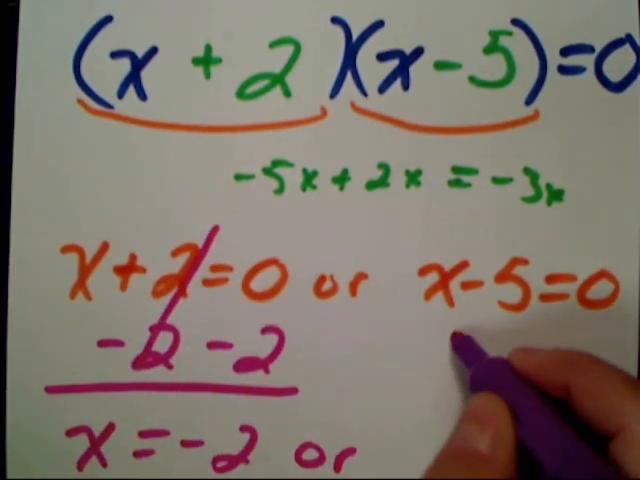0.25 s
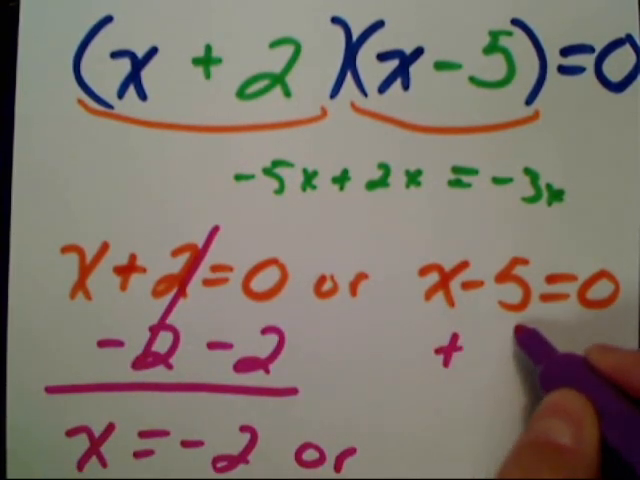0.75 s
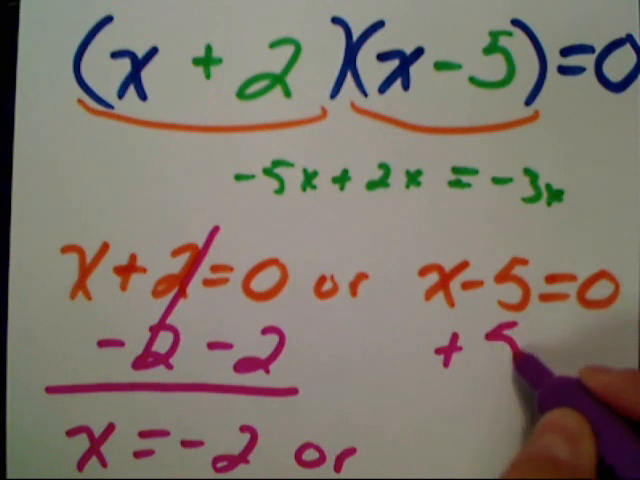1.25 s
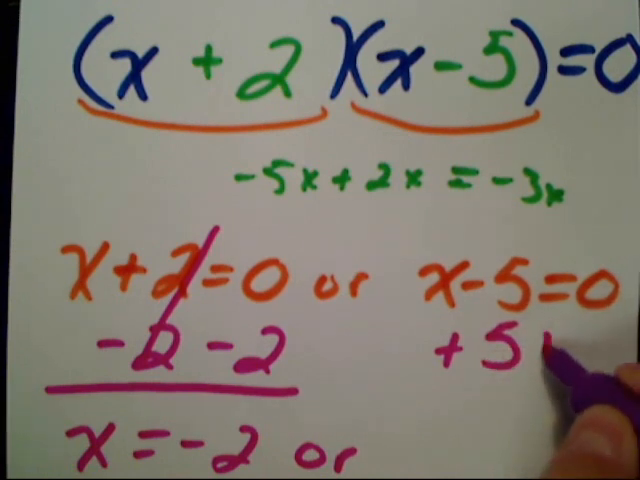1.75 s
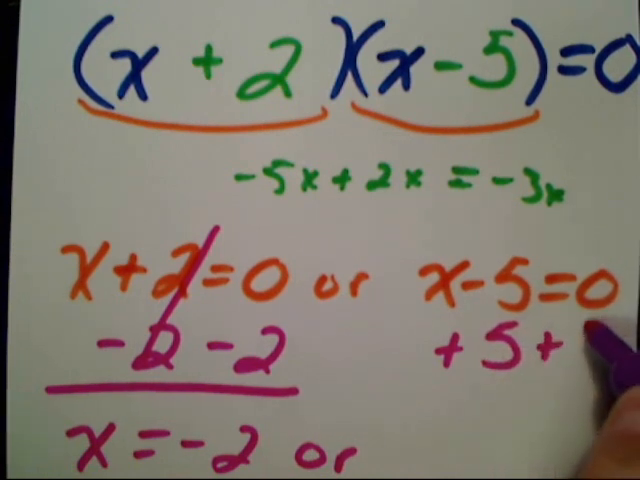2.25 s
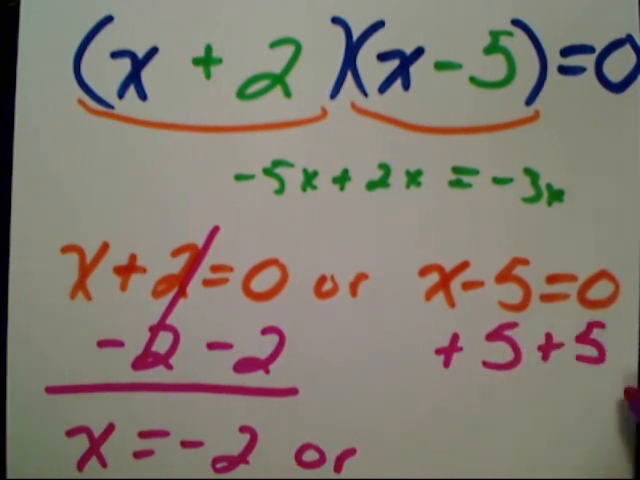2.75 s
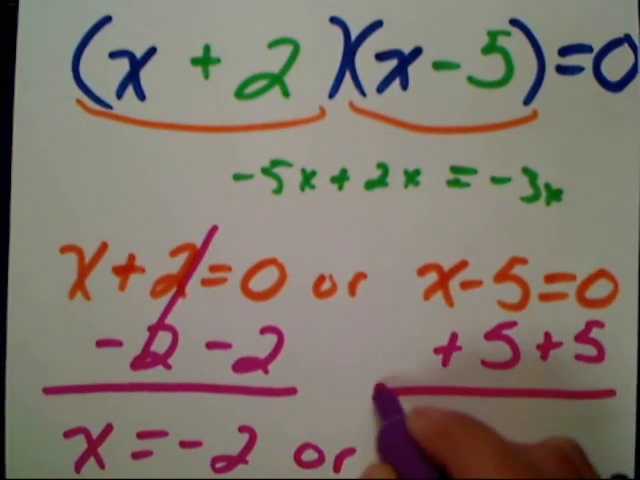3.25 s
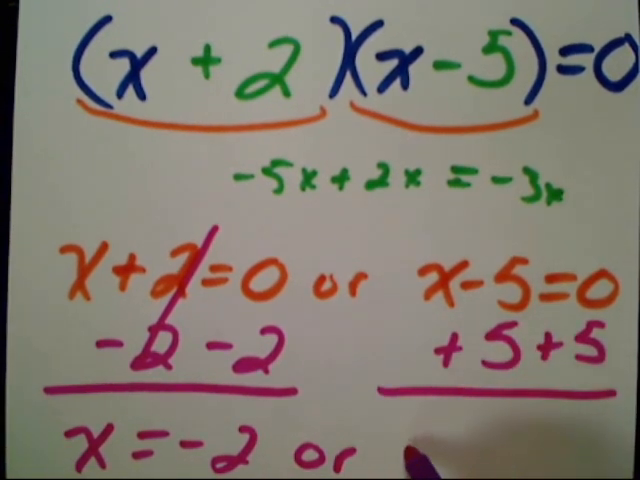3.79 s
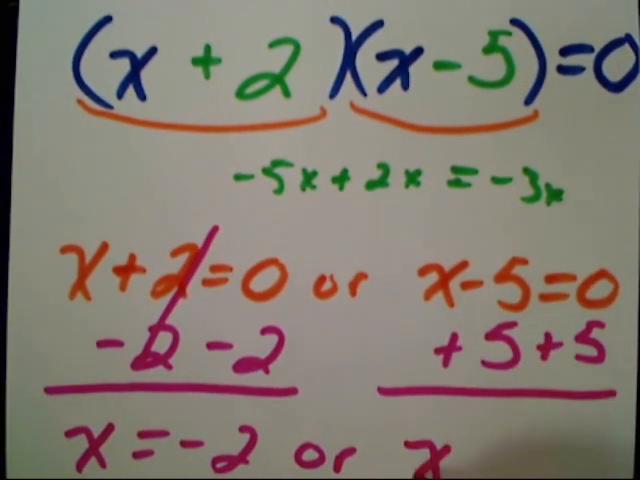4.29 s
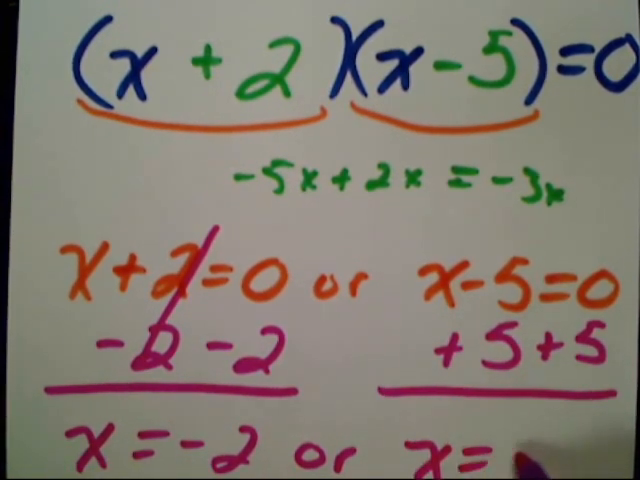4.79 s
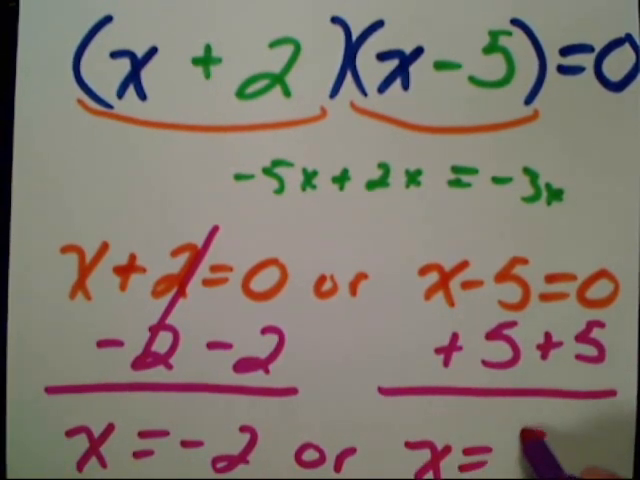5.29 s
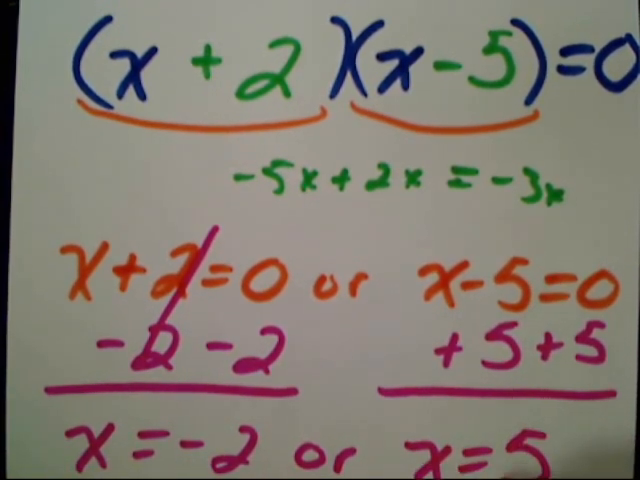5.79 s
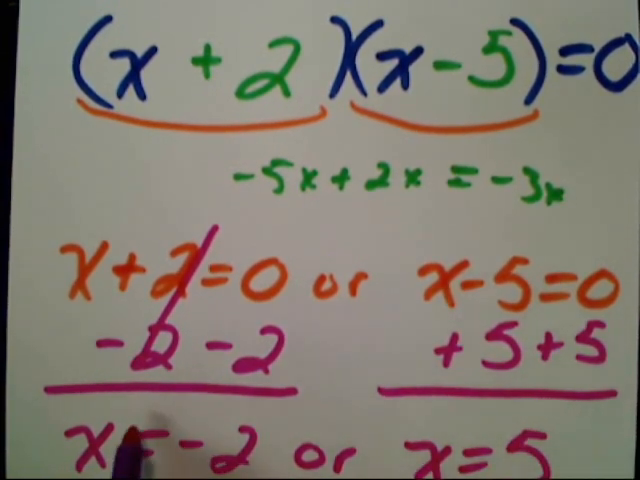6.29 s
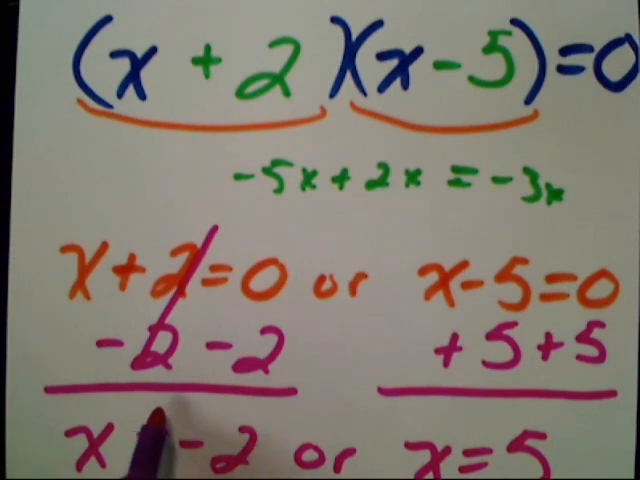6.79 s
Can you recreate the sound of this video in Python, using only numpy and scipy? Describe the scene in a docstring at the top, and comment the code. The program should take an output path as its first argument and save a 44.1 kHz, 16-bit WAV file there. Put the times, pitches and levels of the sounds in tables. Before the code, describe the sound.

A felt-tip marker taps and scratches short dry strokes on paper, a fast underline and a longer loop, over a low steady room hum.

```python
"""A felt-tip marker writes short strokes, a fast underline and a long loop on a sheet of paper.
Its sounds are tiny random impulses (snagging fibres), filtered into scrape, rasp and top fizz.
Each tap is a few ringing desk tones plus a noise click; a brief squeak, then faint wavering tones, are sines.
The hand brushes the sheet in smooth swells of filtered impulses; a short room tail follows it all.
Mains hum and a thin electronic whine are sine tones; low rumble and air are filtered noise."""
import sys
import numpy as np
from scipy import signal
from scipy.fft import rfft, irfft, next_fast_len
from scipy.io import wavfile
from scipy.ndimage import uniform_filter1d, map_coordinates

SR = 44100
rng = np.random.default_rng(int(sys.argv[2]) if len(sys.argv) > 2 else 0)


def master(y):
    """Save y as 16-bit WAV."""
    cut = np.clip(np.atleast_2d(y).T, -1, 1)
    pcm = np.round(cut * 32767)  # scale
    wavfile.write(sys.argv[1], SR, pcm.astype(np.int16))


N = 310464  # length in samples

# Hum and electronic whine: pitch_hz, level_db (rms)
HUM_TONES = [(29.6,-50.5),(58.2,-48),(77,-54.5),(97,-56),(119.8,-44.5),(237,-66),(281,-66),(353,-68),(709,-69.5),(1863,-71),(2762,-78.5),(3725,-74),(5588,-75),(7450,-83),(7989.5,-67.5),(12495,-73)]
# Tone colour of the low room rumble: pitch_hz, relative_level_db
RUMBLE_COLOUR = [(18,2.5),(30,6.5),(40,-9),(52,7),(60,-2.5),(70,-10),(87,-5.5),(102,-3.5),(124,-10.5),(146,-13),(220,-23.5),(300,-44)]
# Tone colour of the room's air: pitch_hz, relative_level_db
AIR_COLOUR = [(120,-12),(190,-7.5),(250,2),(320,-7.5),(480,-8),(680,-14),(820,-17),(1500,-20.5),(2400,-22),(3200,-27.5),(6000,-32),(10000,-34),(12500,-37),(15800,-36)]
# The hand shifting on the sheet: start_s, length_s, level_db
HAND_SHIFTS = [(-.08, 0.18, -53.5), (0.816, 0.15, -51), (1.368, 0.11, -57), (2.0, .14, -59),
               (2.11, 0.15, -55.5), (2.62, 0.11, -63), (2.718, 0.23, -59.5), (2.871, 0.14, -52),
               (3.686, 0.17, -57.5), (4.115, 0.18, -50), (5.16, .09, -53.5), (5.232, 0.085, -52.5),
               (5.63, 0.042, -54.5)]
# Tone colour of skin on paper: pitch_hz, relative_level_db
BRUSH_COLOUR = [(500,-1),(2000,-10),(5000,-2),(8000,-4),(11000,1.5),(13000,-2),(15800,-9.5)]
# One row per short nib movement; the levels are settings that the friction and mix then adjust:
# start_s, attack_s, hold_s, scrape_db, rasp_db, fizz_db, favoured_hz, damped_hz
PEN_STROKES = [ (0.231, 0.03, .006, -39, -4, -0.5, 5630, 2500),
               (0.331, 0.011, 0.038, -47, 1, -1, 6300, 5230),
               (0.504, 0.026, 0.015, -40, -1.5, -5.5, 5230, 6450),
               (.535, .02, 0.13, -46.5, 3, -3.5, 3230, 6500),
               (0.649, 0.081, 0.023, -34.5, 1, -0.5, 4640, 2660),
               (1.1, 0.029, 0.027, -43, 2, 1, 3250, 10100), (1.309, .011, 0.02, -43, -4, -1.5, 3320, 6300),
               (1.555, 0.027, .009, -36, -6, -3, 3660, 10000),
               (1.654, 0.063, 0.0072, -43, -1.5, -5.5, 6000, 4450),
               (1.787, 0.041, .018, -41.5, 0.5, 0, 3600, 9800),
               (1.84, 0.022, 0.049, -47.5, 0.5, 0.5, 3560, 9800),
               (1.923, 0.035, 0.021, -36, -11, -4.5, 7760, 2520),
               (3.261, .027, 0.026, -40.5, 2.5, -2.5, 4430, 3280),
               (3.314, 0.045, 0.055, -41.5, 1.5, -7.5, 4500, 3240),
               (3.598, 0.013, 0.018, -38.5, 1.5, 5.5, 4620, 3540),
               (3.622, 0.017, 0.017, -34, 0.5, -3, 6100, 3570),
               (3.903, 0.0097, 0.019, -39, -3, -2.5, 5230, 3530),
               (4.09, 0.018, .01, -39, -8, -2, 9000, 8100), (4.599, .022, 0.02, -35, 4, -6.5, 6300, 8600),
               (4.726, 0.015, 0.067, -48, 3, 2.5, 6200, 8600),
               (4.891, .013, 0.055, -42.5, 0, -5, 3200, 7000),
               (4.943, .02, 0.099, -46, 2.5, -10, 3240, 7150),
               (5.045, 0.065, 0.033, -35.5, 2, 1, 5100, 2580), ]
# The fast underline, before the mix trims: time_s, scrape_db, fizz_db (an offset)
UNDERLINE_LEVELS = [(2.35, -70, 10), (2.366, -44, -6), (2.376, -37.5, 0), (2.426, -33.5, 6),
                    (2.472, -34.5, 9.5), (2.552, -31, 9.5), (2.614, -35.5, 3.5), (2.66, -62, -9)]
# Bands the sheet lifts and weakens along the underline: time_s, favoured_hz, damped_hz
UNDERLINE_PLACES = [(2.39, 5960, 3250), (2.44, 7170, 3200), (2.6, 7370, 3320)]
# Resonances of the nib and barrel: pitch_hz, width_hz, lift_db
NIB_RESONANCES = [(3180, 190, 5.5), (5290, 250, 6), (7080, 410, 4), (10160, 2000, 4.5), (12300, 650, 1.5)]
# Tone colour of the main scrape: pitch_hz, relative_level_db
SCRAPE_COLOUR = [(1200,-21),(2200,-11),(2800,-10),(3500,-1.5),(4600,1.5),(6200,-1),(7800,-4),(8700,-5.5),(9800,-7.5),(12000,-61)]
# Tone colour of the sheet's lower rasp: pitch_hz, relative_level_db
RASP_COLOUR = [(200,-5),(400,-5),(550,5),(780,-10),(1020,5),(1200,-4),(1420,2.5),(1900,-6.5),(2400,-11),(4000,-17.5)]
# Tone colour of the top fizz: pitch_hz, relative_level_db
FIZZ_COLOUR = [(6000,-78),(8300,-6.5),(9200,-3),(10700,4),(11400,-1),(12400,-1.5),(13500,-5),(15800,-11)]
# The nib landing, before a shared trim: start_s, level_db, click_db (compared with the knock)
NIB_TAPS = [(0.236, -35, 3), (0.335, -34, -5), (0.449, -36, 1), (0.514, -34, 1), (1.057, -43, -1),
            (3.223, -38, -14), (3.567, -30.5, 0), (3.884, -28, -4), (4.072, -34.5, 0), (4.602, -48, 4),
            (4.732, -43, -4), (5.924, -51, -13)]
# Ringing of sheet and desk under a tap: pitch_hz, relative_level_db, fade_s (time to fall 60 dB)
DESK_TONES = [(368, -10, 0.011), (535, 3.5, 0.017), (935, -3, 0.02), (1360, -12, .02)]
# A brief squeak, then faint wavering tones: start_s, length_s, pitch_hz, level_db
SQUEAK_AND_FAINT_TONES = [(5.132, 0.033, 1034, -47), (5.16, 0.21, 688, -54), (5.38, 0.14, 680, -58)]
# The long loop, before small mix trims: time_s, rub_db, fizz_db (compared with the rub)
LOOP_LEVELS = [(6.298, -81, 25), (6.316, -47, 9), (6.388, -39.5, 6), (6.466, -48, 3), (6.574, -43.5, -2),
               (6.648, -57, -10), (6.678, -55.5, -9), (6.728, -41, -6), (6.796, -43, 5.5), (6.826, -40, 0),
               (6.906, -42, 7.5), (7.04, -42, 4.5)]
# Two sheet resonances and a trough, first between them and later below both:
# time_s, lower_hz, upper_hz, trough_hz
LOOP_HOLLOW = [(6.3,3920,5400,4700),(6.42,3700,7660,4670),(6.55,2880,8200,6030),(6.68,3000,9200,5200),(6.76,5900,9000,5600),(6.85,4760,10000,3700),(7.04,6300,8900,4900)]
# Tone colour of the loop's main rub: pitch_hz, relative_level_db
LOOP_RUB_COLOUR = [(2500,-26.5),(4300,-6.5),(5200,-2.5),(6000,-0.5),(6800,-3.5),(8300,-2),(9200,-3),(10200,-8),(12000,-30)]
# Tone colour of the loop's lower body: pitch_hz, relative_level_db
LOOP_BODY_COLOUR = [(250,-9),(500,2.5),(750,-7.5),(1050,-3),(1400,-4),(1900,1),(2700,-0.5),(3400,0.5),(4200,0),(4800,-13),(6500,-39)]
# Tone colour of the loop's top fizz: pitch_hz, relative_level_db
LOOP_FIZZ_COLOUR = [(6000,-33),(8300,-18),(9300,-5.5),(11200,2.5),(12800,2),(14200,-2),(15800,-5.5)]

SHIFT_CURVE = 0.88  # power that bends each hand swell
ATTACK_DEPTH_DB, RELEASE_S, RELEASE_CURVE = 22, 0.032, 1.1  # climb to full speed; time to lose 20 dB; bend
TOUCH_S = 0.0027  # time for the felt to settle on the paper
USUAL_DB = -42.5  # scrape setting at an ordinary writing speed
RASP_DB, RASP_GROWS, FIZZ_GROWS = -52, 0.46, 1.3  # rasp at that speed; dB gained per dB of scrape
UNDERLINE_RASP_DB = -3
PLACE_CONTRAST_DB, UNDERLINE_CONTRAST_DB = 6.5, 9.5  # lift or cut of the favoured and damped bands
LOOP_BODY_DB, LOOP_BODY_GROWS = -48, 0.4  # body at ordinary speed; dB gained per dB of rub
BAND_LIMIT_HZ = 15780


def amp(db):
    """Turn decibels into a gain."""
    return 10 ** (np.asarray(db) / 20)


def unit(x):
    """Scale to an average (rms) level of 1."""
    return x / np.sqrt(np.mean(x ** 2) + 1e-20)


def wobble(rate):
    """A smooth random curve through a given number of random points a second."""
    points = rng.standard_normal(int(N * rate / SR) + 4)
    return map_coordinates(points, [np.arange(N) * rate / SR])


def filtered(x, response):
    """Multiply each frequency in x by the response there."""
    size = next_fast_len(N + 8192)
    hz = np.fft.rfftfreq(size, 1 / SR)
    return irfft(rfft(x, size) * response(hz), size)[:N]


def coloured(x, spectrum, resonances=()):
    """Shape x with a smooth tone colour and resonant peaks, at rms 1."""
    pitch_hz, level_db = np.transpose(spectrum)

    def response(hz):
        smooth_db = np.interp(np.log(hz + 1), np.log(pitch_hz), level_db)
        peaks_db = sum(lift / (1 + (2 * (hz - centre) / width) ** 2) for centre, width, lift in resonances)
        return amp(smooth_db + peaks_db)

    return unit(filtered(x, response))


def curves(rows):
    """Draw straight lines between rows: one value per sample for each column after the time."""
    s, *columns = np.transpose(rows)
    return [np.interp(np.arange(N) / SR, s, column) for column in columns]


def contact(start, end):
    """1 while the nib is down and 0 otherwise, with soft edges."""
    t = np.arange(N) / SR
    return np.clip(np.minimum(t - start, end - t) / TOUCH_S + 1, 0, 1)


def snags(rate, spread_db):
    """Paper fibres catch and let go: dense tiny impulses of uneven size."""
    caught = rng.random(N) < rate / SR
    sizes = rng.choice([-1, 1], N) * amp(spread_db * rng.standard_normal(N))
    # dividing by the root of the rate keeps dense passages from getting louder
    return unit(caught * sizes / np.sqrt(np.minimum(rate, SR)))


def travelling(x, patchy_db, resonances=(), width=0.11):
    """Many small sheet resonances change as the contact moves; a few (times, Hz, dB) stand out."""
    hz, t, z = signal.stft(x, SR, nperseg=512)
    patches = rng.standard_normal(z.shape)
    patches = uniform_filter1d(patches, size=4, axis=0)  # smooth over pitch
    patches = uniform_filter1d(patches, size=18, axis=1)  # smooth over time
    db = patchy_db * unit(patches)
    for times, centres, lift_db in resonances:
        bumps = lift_db / (1 + (2 * (hz[:, None] / centres - 1) / width) ** 2)
        db = db + [np.interp(t, times, row) for row in bumps]  # each place fades into the next
    return unit(signal.istft(z * amp(db), nperseg=512)[1][:N])


def background():
    """Room rumble and air as filtered noise; most low hum tones wander while the whine stays steadier."""
    t = np.arange(N) / SR
    hum = np.zeros(N)
    for hz, db in HUM_TONES:
        steady = 110 < hz < 130 or hz > 1000
        drift = (.08 if steady else .9) * wobble(6)  # phase wander in radians
        hum += amp(db) * np.sqrt(2) * np.sin(2 * np.pi * (hz * t + rng.random()) + drift)
    rumble = amp(-43.0) * coloured(rng.standard_normal(N), RUMBLE_COLOUR)
    air = amp(-54.0) * coloured(rng.standard_normal(N), AIR_COLOUR)
    return hum + rumble + air


def hand():
    """Skin brushes the paper lightly, each move one smooth swell."""
    t = np.arange(N) / SR
    swells = []
    for s, length, db in HAND_SHIFTS:
        progress = np.clip((t - s) / length, 0, 1)
        swells.append(amp(db) * np.abs(np.sin(np.pi * progress)) ** SHIFT_CURVE)
    brush = travelling(coloured(snags(15000, spread_db=3.5), BRUSH_COLOUR), patchy_db=2.0)
    return np.max(swells, axis=0) * brush


def room(x, t60):
    """A small furnished room answers with a fading noise tail that falls 60 dB in t60 seconds."""
    t = np.arange(SR // 2) / SR
    tail = rng.standard_normal(len(t)) * amp(-60 * t / t60) * (t > .004)
    return signal.fftconvolve(x, tail / np.linalg.norm(tail))[:N]


def stroke_shape(start, attack, hold):
    """Level in dB of one movement: the nib speeds up, runs on and brakes."""
    t = np.arange(N) / SR - start
    speeding = np.clip(1 - t / attack, 0, 1)
    braking = np.clip((t - attack - hold) / RELEASE_S, 0, 10)
    return -ATTACK_DEPTH_DB * speeding ** 2 - 20 * braking ** RELEASE_CURVE


def friction(scrape_db, rasp_db, fizz_db):
    """Gains of scrape, rasp and fizz: speed lifts the fizz most and the low rasp least."""
    speed_db = scrape_db - USUAL_DB
    rasp_level_db = RASP_DB + rasp_db + RASP_GROWS * speed_db
    fizz_level_db = USUAL_DB + fizz_db + FIZZ_GROWS * speed_db
    return amp([scrape_db, rasp_level_db, fizz_level_db])


def pen_path():
    """Friction gains over all strokes and the underline, and the sheet's colour under the nib."""
    line_db, line_fizz_db = curves(UNDERLINE_LEVELS)
    line_contact = contact(UNDERLINE_LEVELS[0][0], UNDERLINE_LEVELS[-1][0])
    gains = friction(line_db, UNDERLINE_RASP_DB, line_fizz_db - 1.6) * line_contact
    places = [(*row, UNDERLINE_CONTRAST_DB) for row in UNDERLINE_PLACES]
    for s, attack, hold, db, rasp_db, fizz_db, favoured, damped in PEN_STROKES:
        stroke_db = db + stroke_shape(s, attack, hold)
        stroke = friction(stroke_db, rasp_db, fizz_db) * contact(s, np.inf)
        gains = np.maximum(gains, stroke)  # the louder movement wins
        places.append((s + attack + hold / 2, favoured, damped, PLACE_CONTRAST_DB))
    s, favoured, damped, contrast_db = np.transpose(sorted(places))
    return gains, [(s, favoured, contrast_db), (s, damped, -contrast_db)]


def marker():
    """Felt drags over fibres: a faster stroke is louder and its snags are denser."""
    (scrape_gain, rasp_gain, fizz_gain), place = pen_path()
    snag_rate = 9000 * (scrape_gain / amp(USUAL_DB) + .01) ** .25  # impulses a second
    fibres = snags(snag_rate, spread_db=1)
    scrape = travelling(coloured(fibres, SCRAPE_COLOUR, NIB_RESONANCES), patchy_db=3.0, resonances=place)
    rasp = travelling(coloured(fibres, RASP_COLOUR), patchy_db=4)
    fizz = travelling(coloured(fibres, FIZZ_COLOUR, NIB_RESONANCES), patchy_db=1.1, resonances=place)
    return amp(-1.16) * scrape_gain * scrape + rasp_gain * rasp + amp(-3.9) * fizz_gain * fizz


def taps():
    """The soft nib knocks the desk through the sheet: fading tones with a tiny noise click."""
    out, t = np.zeros(N + SR), np.arange(SR // 8) / SR
    for s, db, click_db in NIB_TAPS:
        knock = np.zeros(len(t))
        for hz, tone_db, t60 in DESK_TONES:
            fading_db = tone_db + rng.normal(0, 0.67) - 60 * t / t60  # each tap differs a little
            knock += amp(fading_db) * np.sin(2 * np.pi * hz * t)
        bright_noise = np.diff(rng.standard_normal(len(t) + 1))
        click = bright_noise * amp(click_db - 7 - 60 * t / .025)
        out[round(s * SR):][:len(t)] += amp(db - 10.5) * (knock + click)
    return out[:N]


def squeak_and_faint_tones():
    """A brief squeak, then faint wavering tones, each with a weak octave, swell and fade."""
    t, out = np.arange(N) / SR, np.zeros(N)
    for s, length, hz, db in SQUEAK_AND_FAINT_TONES:
        swell = np.sin(np.pi * np.clip((t - s) / length, 0, 1))
        phase = 2 * np.pi * np.cumsum(hz * (1 + 0.0155 * wobble(120))) / SR
        out += amp(db) * swell * (np.sin(phase) + amp(-10) * np.sin(2 * phase))
    return out


def loop():
    """One long stroke: its resonances glide as the nib travels, and it dulls where it slows to turn."""
    rub_db, fizz_db = curves(LOOP_LEVELS)
    body_db = LOOP_BODY_DB + LOOP_BODY_GROWS * (rub_db - USUAL_DB)
    s, lower, upper, trough = np.transpose(LOOP_HOLLOW)
    lift_db, trough_db = 5, -4.5
    hollow = [(s, lower, lift_db), (s, upper, lift_db), (s, trough, trough_db)]
    fibres = snags(16000, spread_db=2.5)
    rub = travelling(coloured(fibres, LOOP_RUB_COLOUR), patchy_db=3.0, resonances=hollow)
    body = travelling(coloured(fibres, LOOP_BODY_COLOUR), patchy_db=4.0, resonances=hollow)
    fizz = travelling(coloured(fibres, LOOP_FIZZ_COLOUR), patchy_db=1.7)
    mix = amp(rub_db + 0.25) * rub + amp(body_db) * body + amp(rub_db + fizz_db - 1.1) * fizz
    return mix * contact(LOOP_LEVELS[0][0], np.inf)


def scene():
    """Everything reaches one microphone, the same on both channels."""
    writing = hand() + marker() + taps() + squeak_and_faint_tones() + loop()
    mono = background() + writing + amp(-14.5) * room(writing, t60=0.2)
    return np.array([mono, mono])


def record(dry):
    """The recorder keeps nothing above its band limit."""
    return np.array([filtered(x, lambda hz: hz < BAND_LIMIT_HZ) for x in dry])


dry = scene()
out = record(dry)
master(out)
```